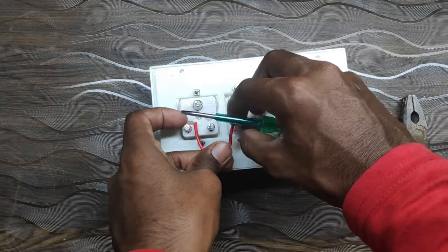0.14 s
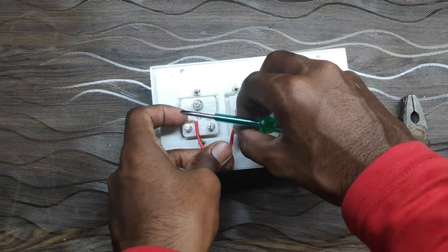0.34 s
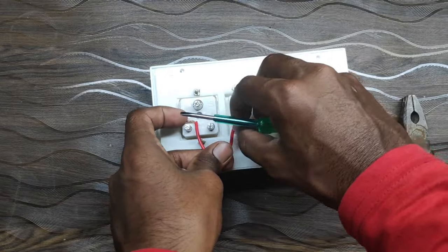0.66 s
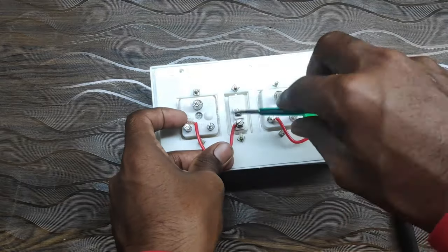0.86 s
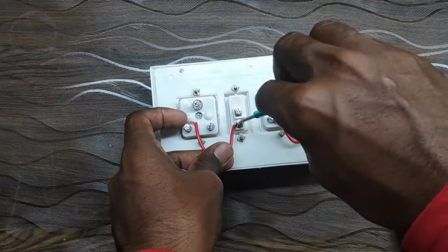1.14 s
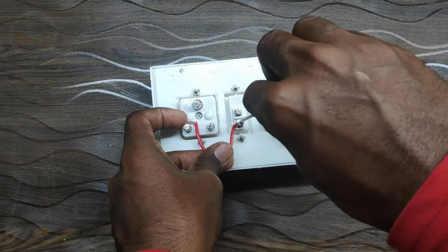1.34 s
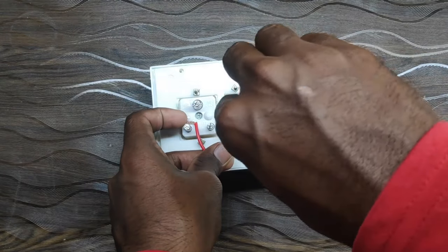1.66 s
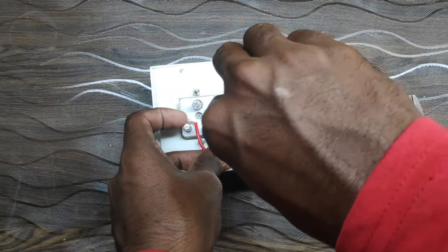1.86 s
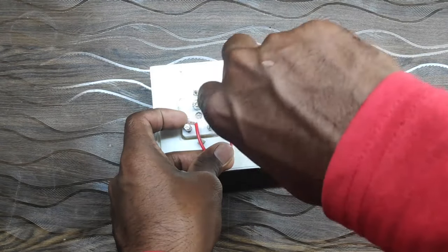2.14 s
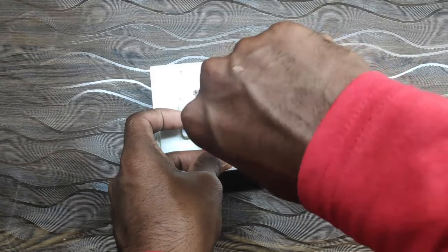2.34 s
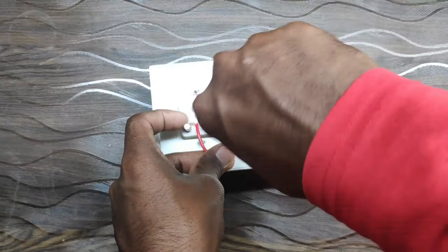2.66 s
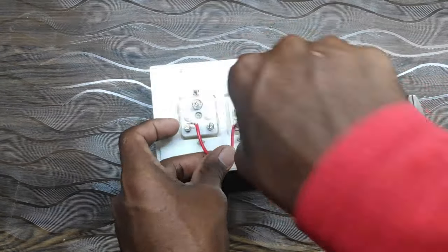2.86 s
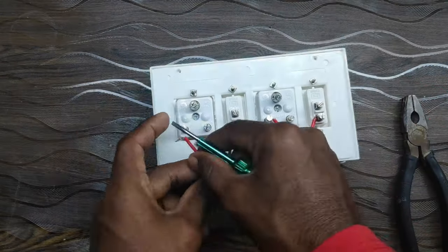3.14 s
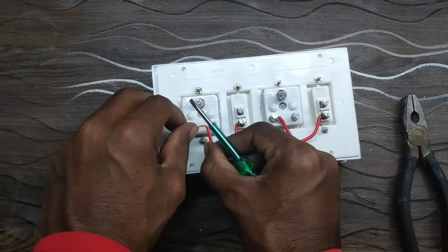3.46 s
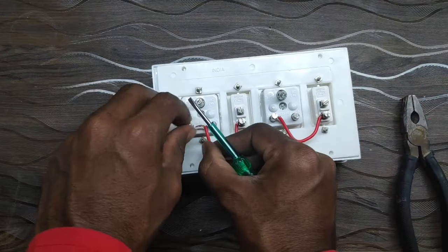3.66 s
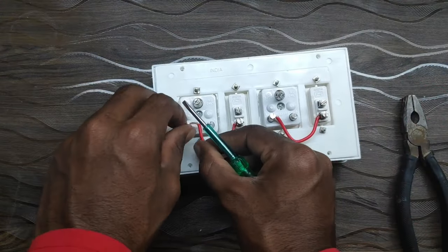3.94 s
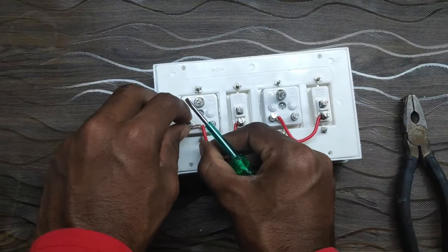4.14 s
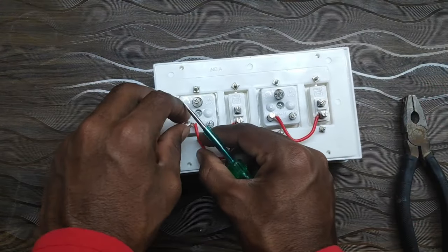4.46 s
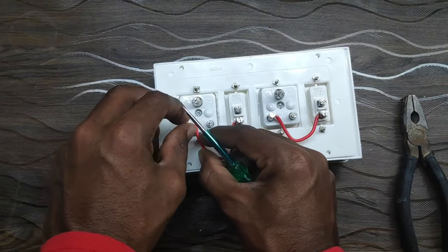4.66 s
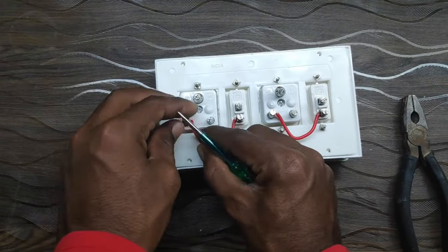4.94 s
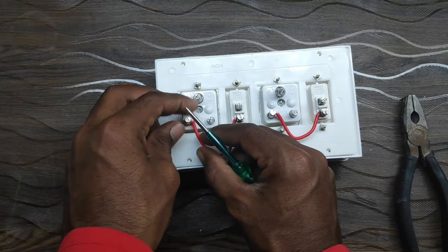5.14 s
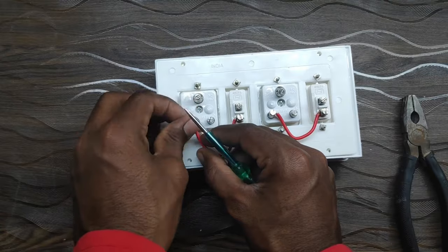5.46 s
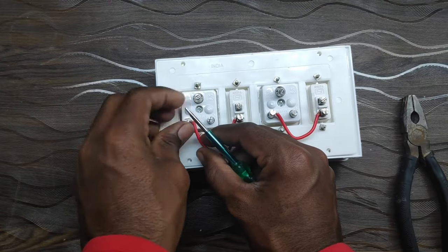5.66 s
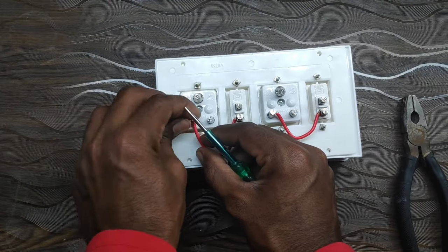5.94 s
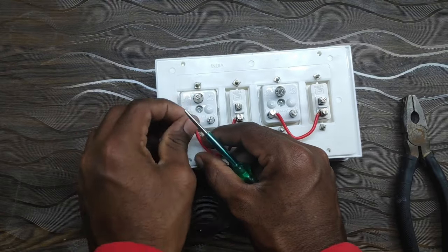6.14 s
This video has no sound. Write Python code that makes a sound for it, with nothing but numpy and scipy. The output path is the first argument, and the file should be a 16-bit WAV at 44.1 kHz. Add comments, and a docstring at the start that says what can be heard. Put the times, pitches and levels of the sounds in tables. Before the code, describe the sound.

Very close, a screwdriver and stiff wire work on brass terminals in a hollow plastic board. Quick bright scrapes, crisp clicks and dull knocks open, pause briefly, then return in a small cluster. Faint touches follow until a hard scrape and hollow knock near the middle; afterward light ticks patter on and thin out. Hand rumble, rubbing and quiet hiss lie beneath, in a small still room caught by a phone just above.

```python
"""Hands work a screwdriver and a stiff wire on the brass terminals of a hollow plastic switch board, a phone just above.
Quick scrapes, clean taps and knocks come first, a few more follow at 1.3 s, then mostly faint touches from 1.8 s;
a hard scrape and knock land at 3.3 s, then short touches run on from 4 s and thin out by 6.1 s.
Scrapes are short bursts of grit ringing screw, blade and plastic, taps are single clicks ringing the same parts,
and knocks are a blow and a push ringing board and bench. Hand rumble, rub and rustle and a quiet hiss last throughout."""
import sys
import numpy as np
from scipy import signal
from scipy.fft import rfft, irfft
from scipy.io import wavfile
from scipy.ndimage import uniform_filter1d

SR = 44100
rng = np.random.default_rng(int(sys.argv[2]) if len(sys.argv) > 2 else 0)


def to_wav(sig):
    """Store sig (one row per channel, or 1-D mono) as 16-bit WAV at the path in sys.argv[1].

    Samples outside -1..1 are clipped; the rate is SR.
    """
    pcm = np.clip(np.atleast_2d(sig), -1, 1) * 32767
    pcm = np.round(pcm).astype(np.int16)
    wavfile.write(sys.argv[1], SR, pcm.T)  # frames by channels


N = 277830

# metal scraping on brass: (time [s], strength [dB], swell time [ms], favoured ring [Hz])
SCRAPE_EVENTS = [(0.022, -21, 3.7, 7350), (0.035, -20, 6.8, 8170), (0.1034, -17, 11.6, 7240),
                 (0.242, -29.5, 1, 5510), (0.2668, -22.5, 18, 7350), (0.2936, -17, 6.2, 10850),
                 (0.45, -25.5, 13.5, 7950), (0.5, -31.5, 2.1, 7270), (0.595, -20, 2.6, 6050),
                 (0.6427, -29, 8.7, 6400), (0.71, -40.5, 2.7, 6550), (0.7414, -22, 16.4, 6670),
                 (0.786, -21.5, 6, 6354), (0.831, -21, 5.9, 6260), (1.292, -27.5, 2.9, 8100),
                 (1.434, -20.5, 2.8, 6270), (1.5821, -28, 4, 8710), (1.428, -35.5, 3.1, 6400),
                 (1.652, -31.5, 10, 6310), (1.822, -55.5, 16.6, 4800), (2.0275, -48, 12, 7500),
                 (2.073, -43, 9.7, 12680), (2.176, -50, 3, 5510), (2.365, -39, 5.2, 10080),
                 (2.556, -41, 3.9, 4686), (2.827, -57, 12.5, 5810), (2.945, -34, 6.8, 4850),
                 (2.982, -34, 4.2, 3330), (3.018, -56, 4.4, 3170), (3.062, -39, 9.4, 8450),
                 (3.101, -22, 7.5, 8110), (3.258, -35, 12.7, 5760), (3.316, -14, 11.3, 6230),
                 (3.446, -38, 4.8, 5740), (3.5563, -29, 8.4, 9300), (3.6038, -30.5, 6.1, 6240),
                 (3.709, -43.5, 2.4, 4530), (3.773, -20.5, 12.4, 4653), (3.916, -42.5, 1.7, 6540),
                 (3.991, -38.5, 20, 6960), (4.0327, -30, 9.2, 6240), (4.084, -33.5, 3.7, 8200),
                 (4.1888, -30, 2.6, 8160), (4.4278, -52.5, 4.5, 3020), (4.462, -22.5, 2.5, 8020),
                 (4.492, -25, 10.3, 6090), (4.554, -33, 4.7, 7650), (4.648, -45.5, 4.1, 5280),
                 (4.6928, -34, 2.8, 7300), (4.7321, -30.5, 3.2, 7670), (4.78, -30.5, 4, 7050),
                 (4.8, -25.5, 3.2, 3380), (4.8522, -34, 3.1, 5280), (4.9193, -42.5, 9.2, 4435),
                 (4.9462, -40, 6.5, 5840), (5.0002, -22.5, 5.8, 6435), (5.018, -28, 9.7, 4680),
                 (5.0712, -29, 1.4, 6600), (5.164, -28, 11.3, 2945), (5.216, -27.5, 5.5, 6700),
                 (5.269, -34.5, 21.5, 13070), (5.297, -25, 4, 5625), (5.3862, -33, 5.3, 4800),
                 (5.4274, -30, 2, 2990), (5.472, -31, 8.1, 13070), (5.511, -30.5, 10.3, 5605),
                 (5.6243, -41, 3.3, 5800), (5.68, -36.5, 4, 6660), (5.9712, -43, 6.9, 4550),
                 (6.128, -44.5, 15.6, 9160)]
# the blade striking brass cleanly: (time [s], strength [dB], favoured ring [Hz])
TAP_EVENTS = [(0.0226, -22.5, 7160), (0.109, -12.5, 6540), (0.2453, -18.5, 6000), (0.5024, -15.5, 6770),
              (0.598, -14, 6550), (0.7892, -17.5, 6270), (1.294, -21.5, 7530), (1.5856, -18.5, 9500),
              (1.6558, -22.5, 6700), (2.557, -29, 3110), (3.4492, -22.5, 5860), (3.912, -28, 6550),
              (4.1912, -15.5, 7900), (4.4661, -21, 3140), (4.4897, -24, 6100), (4.564, -21, 8100),
              (4.804, -22, 3400), (5.0747, -15.5, 6600), (5.22, -17, 6800), (5.2788, -15, 12600),
              (5.3006, -16, 5470), (5.429, -28.5, 3240)]
# the board jolted on the bench: (time [s], strength [dB], hardness [dB], favoured ring [Hz])
KNOCK_EVENTS = [(.108, -40.5, -6.5, 660), (0.136, -41.5, -3, 650), (.3, -32, -12.5, 370),
                (0.467, -62, -42, 402), (0.652, -36, -20.5, 480), (.733, -33, -27, 493),
                (.746, -26, -22, 432), (0.767, -33, -36.5, 265), (0.779, -50.5, -24, 99.8),
                (0.79, -29.5, -14.5, 690), (0.838, -36.5, -5, 890), (1.2947, -26.5, -4, 404),
                (1.4369, -26, -2, 427), (1.512, -39, -17.5, 650), (1.584, -30.5, -4, 618),
                (1.654, -27, -14.5, 393), (1.677, -30, -9.5, 650), (1.878, -33.5, -9, 670),
                (2.002, -39.5, -18.5, 660), (2.035, -33.5, -18, 649), (2.07, -36, -35.5, 341),
                (2.176, -38, -13, 1290), (2.36, -45, -5, 1330), (2.425, -44, -17.5, 650),
                (2.556, -27, -9.5, 660), (2.65, -36, -32, 270), (2.663, -51, -25.5, 128),
                (2.599, -43.5, -52, 252), (2.938, -39.5, -16, 650), (3.018, -35.5, -16.5, 372),
                (3.061, -25, -16, 718), (3.081, -30, -18.5, 286), (3.105, -41.5, -26, 52),
                (3.226, -38.5, -31, 670), (3.253, -32.5, -29.5, 392), (3.272, -30, -11.5, 650),
                (3.311, -14, -11.5, 280), (3.322, -20, -5, 650), (3.332, -24.5, -4.5, 1280),
                (3.35, -24, -7.5, 497), (3.435, -31.5, -18, 293), (3.45, -48.5, 1, 1660),
                (4.426, -48, 0, 1584), (4.489, -28, -21, 465), (4.51, -45, -23, 111),
                (4.731, -45, -10, 770), (4.8, -29.5, -2, 805), (4.952, -36.5, -20.5, 372),
                (5.004, -27.5, -5.5, 856), (5.172, -36.5, -2.5, 780), (5.297, -37.5, -8.5, 650),
                (5.389, -34, -11, 402), (5.477, -31.5, -14, 415), (5.516, -33.5, -2.5, 654),
                (5.624, -37.5, -14, 390), (5.675, -35, -18.5, 393), (5.873, -51, -9, 390),
                (5.973, -38, -22.5, 649), (6.06, -43, -15.5, 793), (6.127, -37, -20, 393)]
# hands resting on board and bench: (time [s], rumble [dB], skin rub [dB], rustle [dB])
HAND_LEVELS = [(0.0, -57.5, -59.5, -56.5), (0.5, -58, -85.5, -80), (0.7, -54.5, -55.5, -60.5),
               (0.9, -63, -84, -81.5), (1.3, -58, -80.5, -78.5), (1.55, -57.5, -65, -82),
               (1.8, -59.5, -74.5, -79), (2.4, -58, -68.5, -88.5), (3.1, -51.5, -62, -81.5),
               (3.8, -57, -73.5, -71.5), (4.35, -59, -72, -79), (5.1, -57, -64.5, -72.5),
               (5.4, -54, -55, -58.5), (5.75, -58, -72.5, -76), (6.0, -61.5, -60.5, -70.5),
               (6.3, -68.5, -77, -86.5)]
# terminal resonances: face plate under 2.8 kHz, rocker up to 3.6 kHz, switch block up to 5.9 kHz,
# screw up to 10 kHz, blade tip above: (pitch [Hz], width [Hz], level [dB])
TERMINAL_MODES = [(1740, 380, -7), (2520, 310, -7), (3137, 170, -3.5), (3441, 61, -8), (3780, 800, -6.5),
                  (4577, 580, -3), (5440, 420, -6.5), (5955, 220, -7), (6553, 490, -5.5), (7475, 480, -4.5),
                  (8200, 350, -6.5), (8850, 400, -6.5), (9500, 690, -8), (10440, 450, -7),
                  (11280, 530, -4.5), (12500, 1300, -7), (12800, 87, -7.5), (13150, 690, -11)]
# how much each part joins in, against the screw:
# (time [s], face plate [dB], rocker [dB], switch block [dB], blade tip [dB])
PART_SHARES = [(0, -10.5, -9.5, -4, -3.5), (0.801, -3.5, -4, -0.5, -7), (1.5, -1.5, -3.5, -1, -9.5),
               (2.099, 3, -3, -3.5, 11.5), (2.902, -2, 0.5, 0, -7), (3.899, -4.5, -4.5, -5.5, -11.5),
               (4.7, -6.5, 1, -0.5, -7.5), (5.401, 4.5, 4.5, 3.5, -7.5), (5.7, -5.5, 3, 1, 9.5),
               (6.3, -17, -3, -7, 6)]
# board resonances: bench under 200 Hz, hollow box up to 1 kHz, face plate above: (pitch [Hz], width [Hz], level [dB])
BOARD_MODES = [(53.3, 26, 8), (132, 14, 10.5), (261, 44.5, -6.5), (305.3, 39, -6), (388, 32, -2.5),
               (494.6, 31, -6), (649.3, 63, -3), (776, 40, -9.5), (900, 120, -12), (1220, 250, 5.5),
               (1760, 400, 2)]
BOX_MODES = [mode for mode in BOARD_MODES if 200 < mode[0] < 1000]
# colour of the still room's hiss: (frequency [Hz], relative level [dB])
AIR_COLOUR = [(88, -39.5), (150, 0), (1040, -24), (1350, 4), (1770, -17.5), (2800, 0.5), (5250, -20),
              (6100, -7), (9300, -8), (13000, -12), (14500, -26)]
# the two microphone ports: (frequency [Hz], left minus right [dB], lead of the left [radians], share heard alike [0-1])
PORT_RESPONSE = [(330, 0, 0.13, 0.7), (630, -0.5, 0.7, 0.15), (1500, -1, -1.5, 0.3),
                 (3200, -2.5, -0.5, 0.2), (4450, -2, -3, 0.03), (5880, -8, 0.2, 0.5),
                 (9770, -1.5, -0.18, 0.7), (13200, 12, 1, 0.6)]

# Scrapes and taps
SCRAPE_CREST_DB = 13.5  # allowance for peaks, taken off the strength
TICK_DB, TICK_DB_PER_MS = -2, -1.8  # quick touches start with a gritty tick, long slides hardly
SLIDE_ROUNDNESS = 1.153  # above 1, a burst starts more gently and eases sooner
LEAK_DB, LEAK_TILT = -3.5, 0.69  # grit wakes the upper box modes more than the lower
USUAL_TOUCH_DB = -29
PLASTIC_PER_DB, TIP_PER_DB = -0.1418, 0.5  # light touches are more plastic, firm ones more blade
TAP_DB, TAP_SCATTERED_DB = -1, -8.5  # drive against the strength; scattered part against the shared
FREE_RING = 0.36  # share of each mode's width left in a clean strike: narrower rings longer

# Knocks
KNOCK_CREST_DB = 16.5
THUD_DB, THUD_PER_DB = -25.5, -0.43  # bench against box; more for soft knocks
LEAN_DB = 14.5  # extra bench drive when the favoured ring is the bench itself
PUSH_MS, PUSH_MS_PER_DB = 4.6, 0.5  # swell time before its sign is dropped; hardness moves it
BLOW_DB, BLOW_PER_DB = 30.5, 0.54  # clean blow against the rough push; more for hard knocks
KNOCK_TAIL_DB, KNOCK_TAIL_T60_S = -7, 0.16
BOX_TOP_HZ = 940  # the hollow box passes little above this

# Background and pickup
RUMBLE_WANDER_DB, RUB_WANDER_DB = 3, 4
AIR_DB = -77
ROOM_T60_S, ROOM_DB = 0.22, -11
MIC_HZ, TOP_HZ = 14200, 15700


def scrapes():
    """Metal grit rings plastic, screw and blade, and leaks into the hollow box."""
    s, strength_db, swell_ms, ring_hz = np.transpose(SCRAPE_EVENTS)
    drive_db = touch_db(s, strength_db, ring_hz) - SCRAPE_CREST_DB
    tick_db = TICK_DB + TICK_DB_PER_MS * swell_ms
    force = bursts(s, drive_db, swell_ms, tick_db, tick_ms=3.5, lead_ms=6.54, tail_db=-9.5, tail_t60=0.17)
    # the force on the lowest terminal mode also drives the box
    leak = undb(LEAK_DB) * (np.array(BOX_MODES)[:, :1] / BOX_TOP_HZ) ** LEAK_TILT
    box = ring(leak * force[0], BOX_MODES, grit(grain_db=2.5, chatter_db=0.5))
    terminal = ring(force, TERMINAL_MODES, grit(grain_db=2, chatter_db=2.5))
    return terminal + box


def taps():
    """A clean strike is one impulse into every terminal mode, which then rings freely."""
    s, strength_db, ring_hz = np.transpose(TAP_EVENTS)
    force = np.zeros((len(TERMINAL_MODES), N))
    force[:, (s * SR).astype(int)] = undb(touch_db(s, strength_db, ring_hz) + TAP_DB).T
    free_modes = np.array(TERMINAL_MODES) * [1, FREE_RING, 1]
    shared_and_scattered = undb([[0], [TAP_SCATTERED_DB]])
    return ring(force, free_modes, shared_and_scattered)


def knocks():
    """A soft blow and a rough push ring the board; hard ones wake the face plate, soft ones the bench."""
    s, strength_db, hard_db, ring_hz = np.transpose(KNOCK_EVENTS)
    on_bench = ring_hz < BOX_MODES[0][0] / 1.5
    thud_db = THUD_DB + THUD_PER_DB * hard_db + LEAN_DB * on_bench
    push_ms = PUSH_MS + PUSH_MS_PER_DB * hard_db
    parts_db = by_part(BOARD_MODES, (200, 1000), thud_db, 0 * s, hard_db)
    drive_db = strength_db[:, None] - KNOCK_CREST_DB + parts_db
    drive_db += favour(BOARD_MODES, ring_hz, boost_db=10.5, spread=0.14, scatter_db=2.24)
    force = bursts(s, drive_db, push_ms, 3 + 0 * s, tick_ms=0.079, lead_ms=7.4,
                   tail_db=KNOCK_TAIL_DB, tail_t60=KNOCK_TAIL_T60_S)
    source = grit(grain_db=1.0, chatter_db=4.0)
    # the blow itself goes only into the part shared by both ports
    source[0, (s * SR).astype(int) + 3] += undb(BLOW_DB + BLOW_PER_DB * hard_db)
    low = np.array(BOARD_MODES)[:, :1] < 1000
    bench_and_box = hollow(ring(force * low, BOARD_MODES, source))
    plate = ring(force * ~low, BOARD_MODES, source)
    contact = np.hanning(15)[None]  # about a third of a millisecond softens the knock
    return signal.fftconvolve(bench_and_box + plate, contact / contact.sum(), "same", axes=1)


def hands():
    """Noise rumbles the bench; grit makes skin drag on the board and fingers rustle on the wire."""
    s, *columns = np.transpose(HAND_LEVELS)
    rumble_db, rub_db, rustle_db = (np.interp(np.arange(N) / SR, s, c) for c in columns)
    rumble_modes = [(30.3, 22, -2.5), (49.9, 28.3, 1.0), (94.0, 56, -6.0)]  # (Hz, width Hz, dB)
    rumble_force = undb(rumble_db + RUMBLE_WANDER_DB * walk(15))
    rumble = ring(rumble_force, rumble_modes, rng.standard_normal((2, N)))
    rub_force = undb(rub_db + RUB_WANDER_DB * walk(21))
    rub = hollow(ring(rub_force, BOX_MODES, grit(grain_db=2.5, chatter_db=6.0)))
    rustle_force = undb(rustle_db + RUB_WANDER_DB * walk(26))
    rustle = ring(rustle_force, TERMINAL_MODES, grit(grain_db=2.0, chatter_db=2.0))
    return rumble + rub + rustle


def air():
    """Faint smooth hiss of the still room: random noise coloured by frequency."""
    hz, db = np.transpose(AIR_COLOUR)
    colour = undb(over_frequency(hz, db))
    return level(irfft(colour * rfft(rng.standard_normal((2, N))), N), AIR_DB)


def room(x):
    """A short dense tail from bench top and walls: noise that dies away, begun after 3 ms."""
    t = np.arange(SR // 2) / SR
    tail = rng.standard_normal((2, len(t))) * 1000. ** (-t / ROOM_T60_S) * (t > .003)
    tail *= undb(ROOM_DB) / np.sqrt(np.sum(tail ** 2, axis=1, keepdims=True))
    return x + signal.fftconvolve(x, tail, axes=1)[:, :N]


def ports(pair):
    """A (shared, scattered) pair reaches both ports; the phone body shades and delays one against the other."""
    hz, *columns = np.transpose(PORT_RESPONSE)
    db, lead, alike = (over_frequency(hz, c) for c in columns)
    alike = np.clip(alike, 0, 1)
    shared, scattered = rfft(pair)
    sign = np.array([[1], [-1]])  # left, right
    mix = np.sqrt((1 + alike) / 2) * shared + sign * np.sqrt((1 - alike) / 2) * scattered
    return irfft(mix * undb(sign * db / 2) * np.exp(.5j * sign * lead), N)


def touch_db(s, strength_db, ring_hz):
    """Drive of every terminal mode for touches of a given time, strength and favoured ring."""
    at, *parts = np.transpose(PART_SHARES)
    plate_db, rocker_db, block_db, tip_db = (np.interp(s, at, c) for c in parts)
    firm_db = strength_db - USUAL_TOUCH_DB
    plastic_db = PLASTIC_PER_DB * firm_db
    parts_db = by_part(TERMINAL_MODES, (2800, 3600, 5900, 10000), plate_db + plastic_db, rocker_db + plastic_db,
                       block_db + plastic_db, 0 * s, tip_db + TIP_PER_DB * firm_db)
    favour_db = favour(TERMINAL_MODES, ring_hz, boost_db=11.5, spread=0.029, scatter_db=3.0)
    return strength_db[:, None] + parts_db + favour_db


def by_part(modes, edges_hz, *part_db):
    """For each event, the drive of every mode by the part it belongs to."""
    part = np.searchsorted(edges_hz, np.array(modes)[:, 0])
    return np.transpose(part_db)[:, part]


def favour(modes, hz, boost_db, spread, scatter_db):
    """Each touch lands elsewhere: modes near its favoured ring are boosted, and all scatter at random."""
    distance = np.log(np.array(modes)[:, 0] / hz[:, None]) / spread
    near = np.exp(-distance ** 2)
    return boost_db * near + scatter_db * rng.standard_normal(near.shape)


def bursts(times, gains_db, swell_ms, tick_db, tick_ms, lead_ms, tail_db, tail_t60):
    """Contact force for each mode: a first tick, a slide that swells and eases, a faint approach and tail."""
    power = np.zeros((gains_db.shape[1], N))
    t = np.arange(-SR // 25, SR // 5) / SR  # from 40 ms before contact to 200 ms after
    after = np.clip(t, 0, None)
    tick = np.exp(-1000 * after / tick_ms) * (t >= 0)
    approach = np.exp(1000 * t / lead_ms)
    tail = 1000. ** (-t / tail_t60)  # falls 60 dB in tail_t60 seconds
    faint = undb(tail_db) * np.where(t < 0, approach, tail)
    for s, gain, swell, sharp in zip(times, undb(gains_db), np.abs(swell_ms) / 1000, undb(tick_db)):
        slide = (after / swell * np.exp(1 - after / swell)) ** SLIDE_ROUNDNESS
        at = int(s * SR) + np.round(t * SR).astype(int)
        ok = (at >= 0) & (at < N)
        shape = slide + faint + sharp * tick
        power[:, at[ok]] += np.outer(gain, shape[ok]) ** 2  # overlapping bursts add as power
    return np.sqrt(power)


def grit(grain_db, chatter_db):
    """Two unrelated streams of tiny random impacts whose pressure chatters together."""
    size = undb(grain_db * rng.exponential(size=N) + chatter_db * walk(400))
    return level(size * rng.standard_normal((2, N)))


def walk(rate):
    """Random levels, each held for 1 / rate seconds, then smoothed twice."""
    k = int(SR / rate)
    held = np.repeat(rng.standard_normal(N // k + 1), k)
    return uniform_filter1d(uniform_filter1d(held, k), k)[:N]


def ring(force, modes, source):
    """Resonators side by side, each with its own force and scaled so that white noise keeps its level."""
    force = np.broadcast_to(force, (len(modes), N))
    out = 0
    for k, (f, (hz, width, db)) in enumerate(zip(force, modes)):
        b, a = signal.iirpeak(hz, hz / width, fs=SR)
        gain = (-1) ** k * undb(db) * np.sqrt(SR / (np.pi * width))  # neighbours have opposite signs
        out = out + gain * signal.lfilter(b, a, f * source)
    return out


def hollow(x):
    """Steep fall above the box modes."""
    return signal.sosfilt(signal.butter(4, BOX_TOP_HZ, fs=SR, output="sos"), x)


def over_frequency(hz, values):
    """Draw a curve through points on a log frequency scale."""
    return np.interp(np.log(np.fft.rfftfreq(N, 1 / SR) + 1), np.log(hz), values)


def undb(db):
    """Gain of a dB value."""
    return 10 ** (np.asarray(db) / 20)


def level(x, db=0):
    """Scale to an rms (average strength) level."""
    return x * undb(db) / np.sqrt(np.mean(x ** 2))


def scene():
    """Touches and knocks pass the ports and the room; hands and air pass the ports only."""
    touches = ports(scrapes() + taps() + knocks())
    background = ports(hands() + air())
    return room(touches) + background


def record(dry):
    """The microphone falls off steeply near the top, then the phone cuts the rest."""
    x = signal.sosfilt(signal.cheby1(11, .5, MIC_HZ, fs=SR, output="sos"), dry)
    return signal.sosfilt(signal.ellip(8, .2, 60, TOP_HZ, fs=SR, output="sos"), x)


dry = scene()
out = record(dry)
to_wav(out)
```